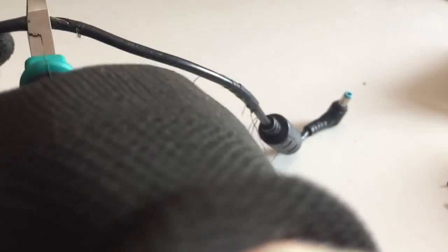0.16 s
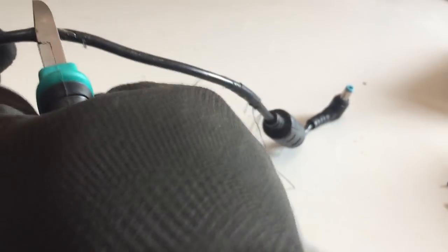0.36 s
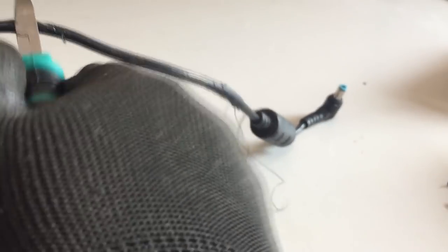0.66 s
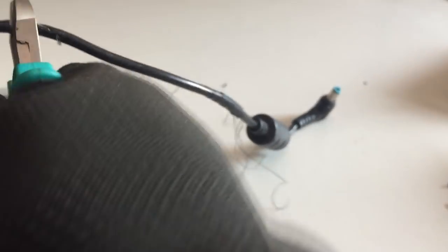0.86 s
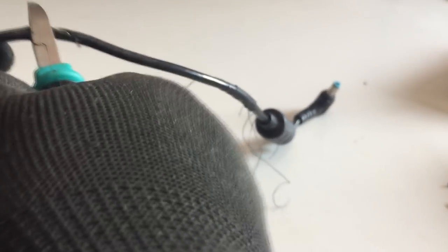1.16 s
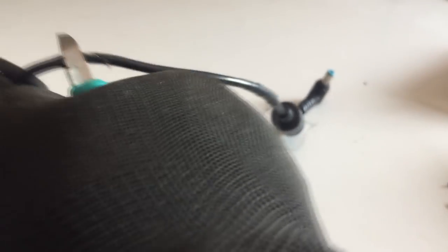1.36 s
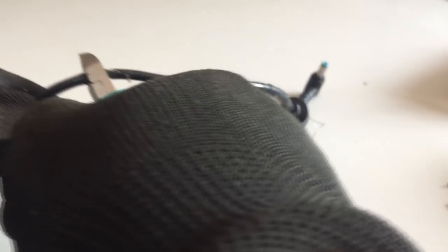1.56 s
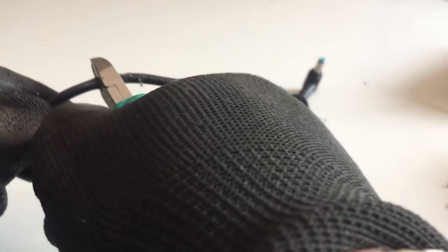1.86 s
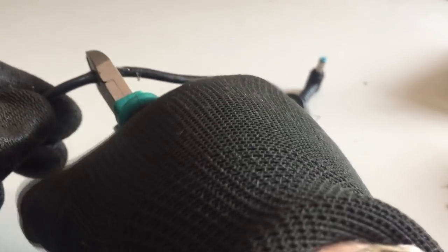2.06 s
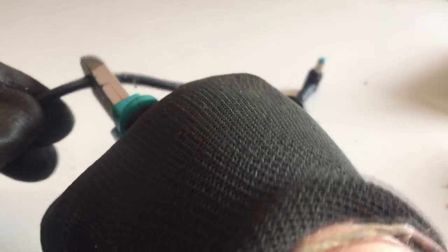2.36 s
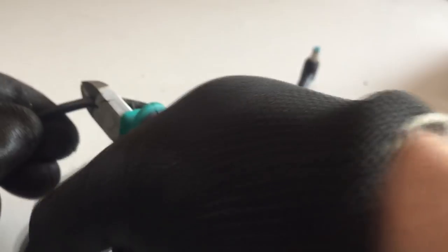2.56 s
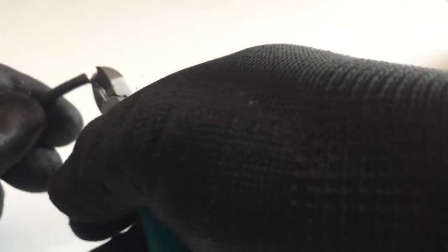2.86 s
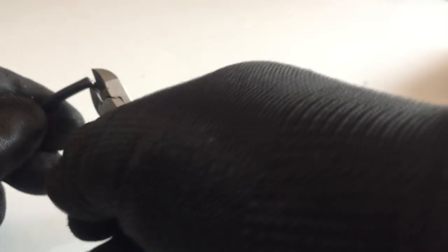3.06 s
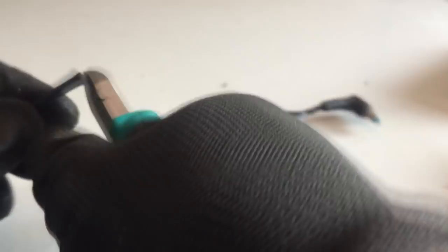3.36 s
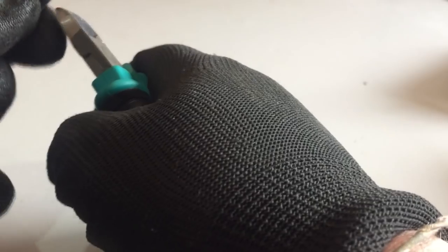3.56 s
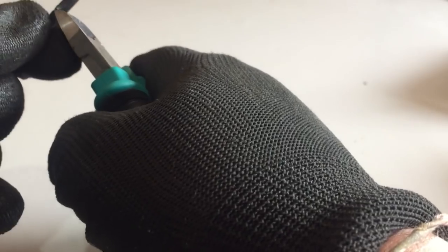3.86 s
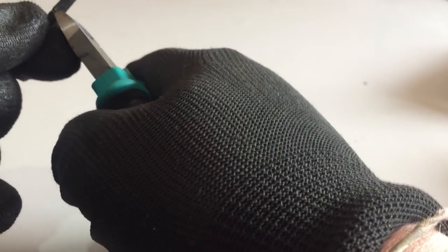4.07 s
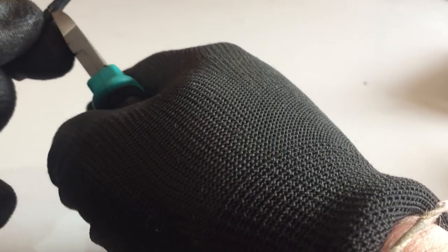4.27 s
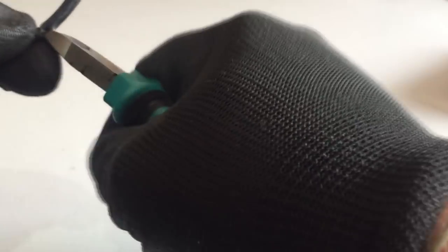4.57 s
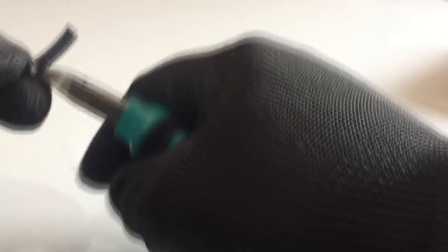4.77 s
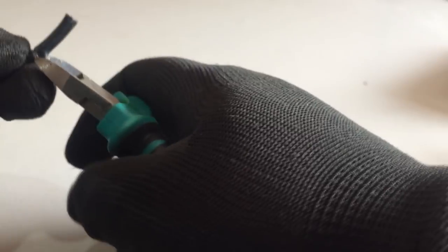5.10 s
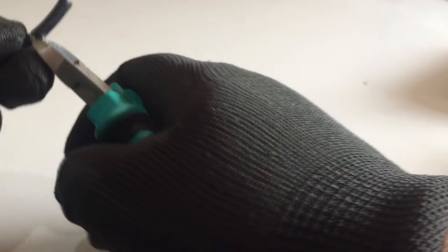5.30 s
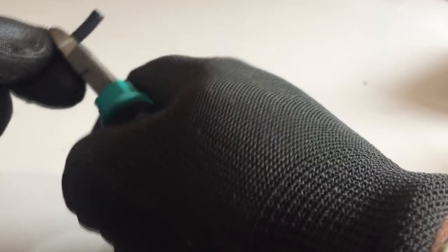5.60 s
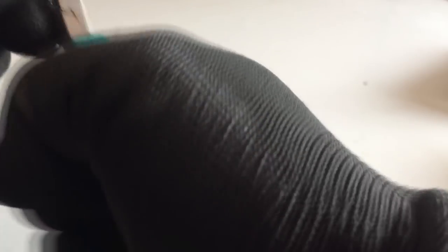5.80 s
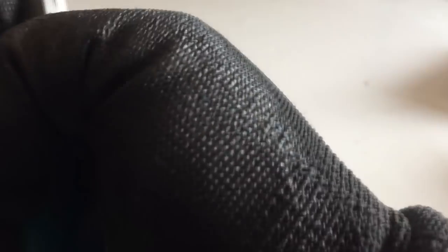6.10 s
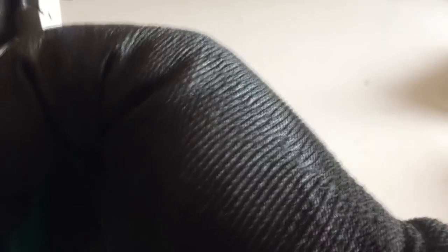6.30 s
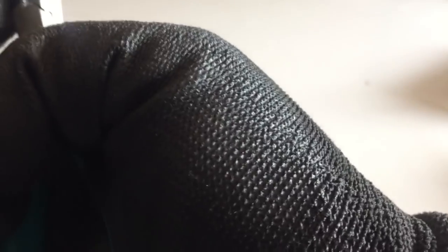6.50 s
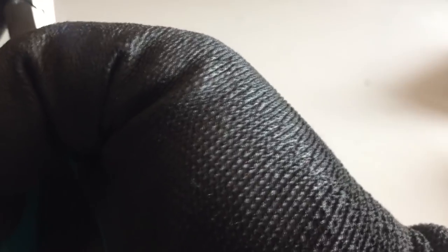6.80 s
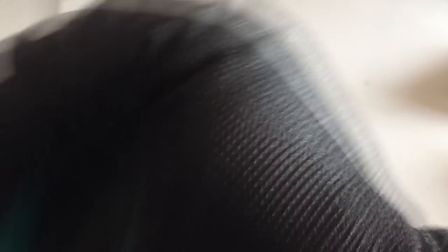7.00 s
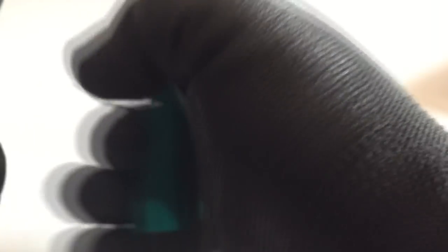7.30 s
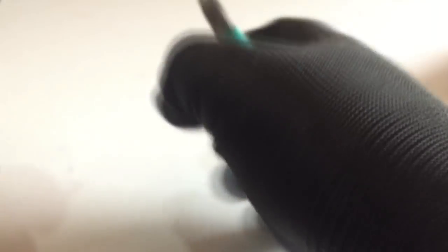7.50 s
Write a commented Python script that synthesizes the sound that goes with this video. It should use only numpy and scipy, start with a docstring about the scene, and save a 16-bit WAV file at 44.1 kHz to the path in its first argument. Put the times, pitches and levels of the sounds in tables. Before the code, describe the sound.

Close to the microphone in a small room, gloves rustle faintly on a cable before side cutters go through it with one hard snip that briefly rings the workbench. A run of dull knocks follows. The jaws then tick through insulation and give two sharp clicks in quick succession, ending in light rubbing, creaks and a few more knocks. Very faint birds chirp outside over a low room rumble.

```python
"""Side cutters at a workbench

Close by in a small room, gloved hands cut a cable: one hard snip sets the bench top's modes ringing.
Dull knocks follow, then the jaws click through insulation. Gloves and cable rub, creak and squeak by
stick-slip friction among soft low thumps, and faint birds chirp outside over a low room rumble."""
import sys
import numpy as np
from scipy import signal
from scipy.fft import rfft, irfft
from scipy.io import wavfile
from scipy.ndimage import uniform_filter1d

SR = 44100
rng = np.random.default_rng(int(sys.argv[2]) if len(sys.argv) > 2 else 0)


def wrap_up_sound(samples):
    """Save the sound to the file named by the first command line argument, as 16-bit audio."""
    columns = np.atleast_2d(samples).T
    # keep every value between -1 and 1, then stretch to whole-number steps
    tamed = np.clip(columns, -1, 1)
    steps = np.round(tamed * 32767).astype(np.int16)
    wavfile.write(sys.argv[1], SR, steps)


N = 337365
TIME = np.arange(N) / SR
HUSH_START_S, HUSH_END_S = 3.511, 4.5  # the ringing of the blows is silent between these times


def snip(pop_hz=1800, pop_width_hz=1900, ring_db=-47.5, thud_db=-51, thud_t60_s=0.26):
    """Impulse excitation: the cable yields, the jaws slam shut, the tool pops and jolts the bench."""
    # contacts during the cut: start_s, level_db, room_db
    contacts = [(2.2038, -10.5, -18), (2.2046, 11, -9), (2.212, -14, -13)]
    # spectrum of the closing jaws: frequency_hz, gain_db
    crack_spectrum = [(40, -12.5), (110, 3), (380, 1), (600, -3), (1000, -6.5), (1350, -4.5), (1700, 1.5),
                      (2080, 0.5), (2350, -5), (2900, -10.5), (3700, -8.5), (4700, -8), (6000, -14.5),
                      (6700, -12), (7600, -22), (9500, -22), (11000, -32.5), (15000, -26)]
    # spectrum of the bench's crowded, damped modes: frequency_hz, relative_density_db
    thud_spectrum = [(30, -26), (70, -3), (110, -3), (250, -13), (500, -14.5), (800, -19), (2000, -53.5),
                     (6000, -81)]
    near, feed = np.zeros((2, N))
    crack = impact(crack_spectrum)
    tool = resonate(crack, pop_hz, pop_width_hz)
    pop = chatter(crack - 2 * tool, t60_s=0.009, db=-14)  # all-pass: the resonance swells after contact
    thud = noise(thud_spectrum)[:SR] * undb(thud_db - 60 * TIME[:SR] / thud_t60_s)
    thud *= 1 - np.exp(-TIME[:SR] / 0.004)
    bench = undb(ring_db) * bench_ring() + thud
    radiated = edge(crack - 0.25 * tool, 4800, "low", order=1)
    for start_s, level_db, room_db in contacts:
        add(near, start_s, undb(level_db) * pop)
        add(near, start_s, undb(level_db) * bench)
        add(feed, start_s, undb(level_db + room_db) * radiated)
    return near, feed


def bench_ring():
    """Free vibration: after a blow, each low mode of the bench top decays at its own rate."""
    # modes of the bench top: frequency_hz, gain_db, t60_s
    bench_modes = [(58.2, 1, 0.74), (70.5, -4.5, 0.4), (108.5, 10.5, 0.16), (115.95, -8.5, 0.58),
                   (126.9, 1.5, 0.7), (142.5, -12.5, 0.37), (161.6, -17, 0.344), (190, -11.5, 0.25),
                   (195, -2, 0.41), (206.6, -15.5, 0.51), (284, -10, 0.64), (294.6, -11, 0.63),
                   (326.2, -9, 0.353), (394, -5, 0.37), (452.7, -10.5, 0.192), (506, -18, 0.21),
                   (664, -14, .25), (712, -14, 0.3)]
    return modes(bench_modes) * (1 - np.exp(-TIME[:SR] / 0.0019))


def knocks(soft_hz=984, jolt_db=-58, jolt_db_per_octave=-7):
    """Contact filtering: all blows ring one body, but a softer one leaves the upper resonances still."""
    # blows about the bench: start_s, level_db, hardness_hz, low_cut_hz, room_db
    blows = [(0.0861, -21, 2480, 200, 2), (2.6041, -9.5, 940, 50, -4.5), (2.9984, 4.5, 1010, 694, -3),
             (3.0226, 0.5, 1850, 520, 3), (3.3283, -12, 1270, 194, -0.5), (3.3457, -13.5, 1140, 200, 1.5),
             (3.4585, -18.5, 3500, 1490, -1.5), (3.4902, -8, 865, 380, 5), (3.5058, -2.5, 1440, 1100, -5),
             (7.4073, -5, 3970, 700, 0), (7.456, -20, 2600, 1820, 0), (7.4614, -9.5, 2980, 1960, -2),
             (7.5055, -15.5, 2880, 1700, 1), (7.5328, -16, 3600, 2200, -1.5)]
    # damped resonances of the struck body: frequency_hz, width_hz, gain_db
    resonances = [(315, 230, 7), (730, 280, -7.5), (1060, 690, -2), (1570, 380, -8.5), (1990, 730, -10),
                  (2410, 490, -10), (3200, 1100, -10), (3950, 480, -12), (9200, 2600, -2.5)]
    near, feed = np.zeros((2, N))
    impulse, ring = signal.unit_impulse(2048), bench_ring()
    body = sum(undb(db) * resonate(impulse, hz, width_hz) for hz, width_hz, db in resonances)
    body = body - 2 * resonate(body, 1200, 1700)  # all-pass: the body takes a cycle to get moving
    for start_s, level_db, hardness_hz, low_cut_hz, room_db in blows:
        blow = edge(body, hardness_hz, "low", order=3)
        blow = undb(level_db) * edge(blow, low_cut_hz, "high", order=1)
        # mostly the middle frequencies reach the room
        radiated = edge(blow, max(hardness_hz, 2120), "low", order=4)
        radiated = undb(room_db) * edge(radiated, 420, "high", order=1)
        surface_echo = undb(-12.5) * delay(blow, 0.00311)
        wall_echo = undb(-12.5) * edge(radiated, 1040, "high", order=1)
        # a harder contact comes from a lighter part and jolts the bench less
        ring_db = level_db + jolt_db + jolt_db_per_octave * np.log2(hardness_hz / soft_hz)
        add(near, start_s, chatter(blow + surface_echo, t60_s=0.026, db=-0.5))
        add(near, start_s, undb(ring_db) * ring)
        add(near, start_s + 0.018, chatter(wall_echo, t60_s=0.013, db=3.5))
        add(feed, start_s, radiated)
    return near, feed


def jaw_clicks(room_db=-17.5, pitch_spread=0.022):
    """Stepwise fracture: the jaws break through in tiny sharp steps, each briefly ringing the steel."""
    # bites into insulation and strands: start_s, level_db, low_cut_hz
    bites = [(4.497, -31, 5500), (4.571, -29.5, 1200), (4.588, -38, 3500), (4.652, -36, 3000),
             (4.668, -38, 2500), (4.7259, -30.5, 2000), (6.0093, -24.5, 699), (6.0115, -21.5, 700),
             (6.02, -31, 5000), (6.0896, -27, 1500), (6.095, -28, 3500), (6.1, -23, 1000),
             (6.1035, -28, 6000), (6.1204, -21, 1000), (6.125, -24, 3500), (6.144, -22, 3500),
             (6.1504, -2, 500), (6.1741, -1.5, 503), (6.181, -24, 4000), (6.282, -20, 7000),
             (6.7737, -25, 3980), (6.9988, -39.5, 2500), (7.077, -36, 1490), (7.126, -27, 1500),
             (7.1442, -21, 5000), (7.221, -30, 2000), (7.258, -31, 1500), (7.317, -22.5, 1500),
             (7.534, -32, 6000), (7.5535, -36, 4500)]
    # spectrum of the steel jaws: frequency_hz, gain_db
    jaw_spectrum = [(200, -44), (1200, -33), (1500, -47.5), (1800, -5), (2500, -1.5), (3200, -8),
                    (4300, -1), (5000, -6), (5900, -2.5), (7000, -3.5), (7700, -17.5), (8600, -7),
                    (9900, -10.5), (10700, -16.5), (14000, -14), (15800, -18)]
    # modes of the steel: mean_frequency_hz, gain_db, t60_s
    jaw_modes = [(2490, -48, 0.012), (4314, -46, .02), (6200, -48, 0.014)]
    near, click = np.zeros(N), impact(jaw_spectrum)
    for start_s, level_db, low_cut_hz in bites:
        # each bite lands elsewhere on the blades and shifts their ring
        bite = modes(jaw_modes, 1 + pitch_spread * rng.standard_normal())
        # the weaker the bite, the longer the chatter and the larger its share
        bite[:len(click)] += chatter(click, t60_s=0.0083 * 2 ** (-level_db / 13), db=-24 - level_db / 2)
        add(near, start_s, undb(level_db) * edge(bite, low_cut_hz, "high"))
    return near, undb(room_db) * near


def rubs(slips_per_s=9000, uneven_db=3, room_db=-15, fastest_share=0.55, squeak_above_db=-60.5):
    """Sliding friction: knit and rubber catch and slip in tiny ticks that swell with the hand's speed."""
    # strokes of glove on cable: start_s, end_s, level_db, brightness_hz
    strokes = [(0, 0.033, -61, 11700), (0.047, 0.093, -61, 8500), (0.33, .47, -83, 12000),
               (0.593, 0.648, -62, 10100), (0.783, 0.847, -63, 6100), (1.0, 1.38, -80.5, 10900),
               (2.555, 2.652, -71, 11900), (2.705, 2.87, -73.5, 12000), (3.244, 3.43, -75, 5290),
               (3.436, 3.482, -64.5, 10800), (4.322, 4.821, -74.5, 14700), (4.85, 5.02, -77, 12000),
               (5.446, 5.58, -71, 5130), (5.722, 5.955, -72, 10500), (6.055, 6.157, -63.5, 7100),
               (6.214, 6.377, -70, 9500), (6.705, 6.843, -75, 7960), (7, 7.224, -66.5, 9200),
               (7.068, 7.109, -56.5, 9900), (7.087, 7.16, -55.5, 13500), (7.214, 7.258, -62.5, 11200),
               (7.245, 7.335, -59, 12700), (7.32, 7.618, -74.5, 13900)]
    # spectrum of one slip: frequency_hz, gain_db
    slip_spectrum = [(200, -2.5), (700, -15.5), (1150, -6.5), (1400, -15), (1750, -9.5), (2300, -6.5),
                     (2900, -5.5), (3700, -3.5), (4900, -11.5), (6200, -6.5), (7600, -13), (9200, -6.5),
                     (10500, -13), (12000, -6.5), (15500, -6.5)]
    # rubber resonances that squeak on hard strokes: frequency_hz, stage_width_hz, gain_db
    resonances = [(1760, 680, -14), (6260, 3200, -2.5)]
    slips = rng.standard_normal(N) * undb(uneven_db * rng.exponential(size=N).clip(0, 5))
    slips *= rng.random(N) < slips_per_s / SR
    slips *= undb(-wobble(N, 140))  # the ribs of the knit bunch the ticks into a rasp
    rasp = signal.fftconvolve(slips, impact(slip_spectrum))[:N]
    squeak = sum(undb(db) * narrow_ring(slips, hz, width_hz) for hz, width_hz, db in resonances)
    near = np.zeros(N)
    for start_s, end_s, level_db, brightness_hz in strokes:
        span = (TIME >= start_s) & (TIME < end_s)
        progress = (TIME[span] - start_s) / (end_s - start_s)
        speed = np.sin(np.pi / 2 * np.interp(progress, [0, fastest_share, 1], [0, 1, 0]))
        friction = unit(edge(rasp[span], brightness_hz, "low"))
        if level_db > squeak_above_db:
            friction += speed * squeak[span]
        near[span] += undb(level_db) * speed * friction
    return near, undb(room_db) * near


def creaks_and_whistle_ring(pulses_per_s=900, uneven_db=3, room_db=-11):
    """Pulse-driven resonance: stick-slip creaks of sheath and glove, and a bird's lingering ring."""
    # narrow-band sounds: start_s, length_s, pitch_hz, stage_q, level_db
    # the rows at 6.134 s and 6.254 s are the faint high ring of a distant bird's whistle
    bursts = [(0.056, 0.026, 3180, 4.4, -62.5), (0.232, 0.1, 1018, 12, -66), (0.596, 0.063, 1100, 2.7, -65),
              (0.585, 0.065, 3100, 15, -71), (0.61, 0.029, 4400, 14, -68), (0.776, 0.085, 3440, 9.9, -66),
              (0.79, 0.055, 1420, 3.4, -73), (3.4527, 0.012, 1930, 5.9, -50),
              (4.926, 0.057, 1270, 3, -64.5), (4.974, 0.023, 1280, 3.7, -58),
              (4.967, 0.025, 2300, 2.5, -68.5), (6, 0.024, 1340, 1.6, -66), (6.081, 0.051, 3920, 4.7, -64),
              (6.134, 0.58, 4070, 3.2, -76.5), (6.254, 0.078, 4140, 2.7, -68.5),
              (7.073, 0.0096, 2230, 1.1, -47), (7.081, 0.11, 1760, 7.8, -62),
              (7.087, 0.039, 2600, 6.1, -65), (7.139, 0.017, 6060, 7.7, -55),
              (7.205, 0.073, 1800, 4.5, -65), (7.23, 0.094, 2380, 6.6, -67), (7.269, 0.0094, 1770, 6, -55),
              (7.276, 0.039, 6240, 7.9, -58.5), (7.311, 0.009, 3570, 5.8, -54)]
    near = np.zeros(N)
    for start_s, length_s, pitch_hz, stage_q, level_db in bursts:
        n = int(length_s * SR)
        pace = rng.exponential(size=n // 40 + 1).repeat(40)[:n]
        pulse_count = np.floor(np.cumsum(pace) * pulses_per_s / SR)
        pulses = np.diff(pulse_count, prepend=-1) * undb(uneven_db * rng.standard_normal(n))
        ring = narrow_ring(pulses, pitch_hz, pitch_hz / stage_q)
        add(near, start_s, undb(level_db) * np.hanning(n) * ring)
    return near, undb(room_db) * near


def grip_squeaks(length_s=0.024, sag=0.036, room_db=-8):
    """Roughness by modulation: the gripped cable squeaks in fluttering tones that sag in pitch."""
    # three quick squeaks: start_s, level_db
    squeaks = [(3.272, -87.5), (3.327, -77), (3.38, -75.5)]
    # partials of a squeak: start_hz, gain_db
    partials = [(3850, 3), (4330, -1), (5720, -6)]
    near = np.zeros(N)
    for start_s, level_db in squeaks:
        for start_hz, gain_db in partials:
            tone = glide(length_s, start_hz, start_hz * (1 - sag), waver=0.025)
            flutter = 1 + wobble(len(tone), 350)
            add(near, start_s, undb(level_db + gain_db) * tone * flutter)
    return near, undb(room_db) * near


def low_thumps():
    """Windowed tone bursts: soft low thumps, some of them the low body of the knocks."""
    # soft low thumps: start_s, pitch_hz, length_s, level_db
    thumps = [(0.0847, 328, 0.0063, -39), (0.086, 212, 0.047, -53.5), (0.088, 400, 0.029, -60),
              (0.602, 54.7, 0.044, -59), (1.76, 133, 0.15, -57), (2.601, 195, 0.037, -45),
              (2.599, 113, 0.035, -42.5), (3.457, 109, 0.033, -45.5), (6.194, 84.5, 0.025, -55.5),
              (7.075, 73, 0.022, -33), (7.404, 196, 0.033, -56.5)]
    near = np.zeros(N)
    for start_s, pitch_hz, length_s, level_db in thumps:
        n = int(length_s * SR)
        add(near, start_s, undb(level_db) * np.hanning(n) * np.sin(2 * np.pi * pitch_hz * TIME[:n]))
    return near


def birds(pip_s=0.053, pip_rise_hz=72, tremble=0.4, direct_db=-4, room_db=-8):
    """Frequency-modulated song: one bird repeats two rising whistles, another gives thin pips."""
    # phrases of the first bird: start_s, level_db
    phrases = [(1.88, -83), (3.99, -74), (6.0, -73)]
    # notes of a phrase: delay_s, length_s, start_hz, end_hz, accent_share, gain_db
    notes = [(0, .18, 3976, 4700, 0.78, 0), (0.147, .23, 3033, 3492, .4, -3.5)]
    # pips of the second bird: start_s, pitch_hz, level_db
    pips = [(1.085, 6080, -77), (1.09, 6470, -78.5), (1.361, 6700, -82), (1.41, 6800, -85),
            (1.495, 6250, -77), (1.837, 7120, -87), (4.397, 6040, -76), (4.462, 6100, -79),
            (4.671, 6750, -81)]
    song = np.zeros(N)
    for start_s, level_db in phrases:
        for delay_s, length_s, start_hz, end_hz, accent_share, gain_db in notes:
            note = glide(length_s, start_hz, end_hz, waver=0.00408, accent_share=accent_share)
            add(song, start_s + delay_s, undb(level_db + gain_db) * note)
    for start_s, pitch_hz, level_db in pips:
        add(song, start_s, undb(level_db) * glide(pip_s, pitch_hz, pitch_hz + pip_rise_hz, waver=0.0086))
    song *= 1 + tremble * wobble(N, 90)
    return undb(direct_db) * song, undb(room_db) * song


def room(feed, build_s=0.005, treble_hz=7500, bands=10):
    """Reverberation: a diffuse field builds up quickly in the small room, and its treble dies first."""
    # reverberation times: frequency_hz, t60_s
    decay_times = [(60, 1), (300, 0.322), (1000, 0.41), (2500, 0.374), (6000, 0.37), (14000, 0.1097)]
    t, hz = TIME[:SR], np.fft.rfftfreq(SR, 1 / SR)
    centres_hz = np.geomspace(decay_times[0][0], decay_times[-1][0], bands)
    white, tail = rfft(rng.standard_normal(SR)), 0
    for weights, t60_s in zip(np.eye(bands), on_log(centres_hz, decay_times)):
        band = irfft(white * on_log(hz, np.c_[centres_hz, weights]), SR)
        fade = undb(-60 * t / t60_s) * (1 - np.exp(-(t / build_s) ** 2))
        tail = tail + band * fade / np.linalg.norm(fade)
    return signal.fftconvolve(feed, edge(tail, treble_hz, "low"))[:N]


def room_noise(base_db=-70, split_hz=400, swell_at_s=2.9, swell_width_s=0.93):
    """Broadband ambient noise: a low rumble swells once under a smooth hiss, then both step down."""
    # spectrum of the background: frequency_hz, relative_density_db
    air_spectrum = [(15, -44.5), (25, -22.5), (43, -9), (92, -3.5), (161, -3), (300, -11), (384, -15),
                    (531, -18.5), (840, -21), (1040, -22), (1890, -24), (4100, -26), (4750, -29),
                    (6200, -28.5), (9400, -34), (10500, -37), (11500, -35), (12900, -39.5), (16000, -56)]
    bed = undb(base_db) * noise(air_spectrum)
    rumble = edge(bed, split_hz, "low", order=1)
    hiss = bed - rumble
    swell_db = 6 * np.exp(-((TIME - swell_at_s) / swell_width_s) ** 2)
    rumble_db = np.where(TIME < HUSH_START_S, 1.4 + swell_db, -0.69)
    hiss_db = np.where(TIME < HUSH_START_S, 2.95, 1.82)
    return rumble * undb(rumble_db) + hiss * undb(hiss_db)


def glide(length_s, start_hz, end_hz, waver, accent_share=0.51, accent_db=12, accent_s=0.018):
    """Frequency sweep: a tone slides ever faster while it swells to a brief accent and fades."""
    n = int(length_s * SR)
    progress = np.linspace(0, 1, n)
    hz = (start_hz + (end_hz - start_hz) * progress ** 1.6) * (1 + waver * wobble(n, 150))
    accent = undb(accent_db * np.exp(-((progress - accent_share) * length_s / accent_s) ** 2))
    envelope = np.sqrt(np.abs(np.sin(np.pi * progress))) * accent
    return envelope * np.sin(2 * np.pi * np.cumsum(hz) / SR)


def impact(spectrum, size=2048):
    """Minimum phase: the tightest causal click with a given spectrum."""
    gain = undb(on_log(np.fft.rfftfreq(size, 1 / SR), spectrum))
    cepstrum = irfft(np.log(gain))
    cepstrum[1:size // 2] *= 2
    cepstrum[size // 2 + 1:] = 0
    return irfft(np.exp(rfft(cepstrum)))[:size // 2]


def chatter(click, t60_s, db):
    """Repeated contact: touching parts follow a click with a dense, decaying run of copies."""
    t = TIME[:len(click)]
    contacts = rng.standard_normal(len(t)) * undb(-60 * t / t60_s) * (1 - np.exp(-t / 0.00042))
    return click + undb(db) * signal.fftconvolve(click, contacts / np.linalg.norm(contacts))[:len(t)]


def modes(table, pitch_ratio=1):
    """Modal superposition: a sum of exponentially decaying sines."""
    t = TIME[:SR]
    return sum(np.sin(2 * np.pi * hz * pitch_ratio * t) * undb(db - 60 * t / t60_s)
               for hz, db, t60_s in table)


def resonate(x, hz, width_hz):
    """Second-order resonance, gain 1 at its centre."""
    return signal.lfilter(*signal.iirpeak(hz, hz / width_hz, fs=SR), x)


def narrow_ring(x, hz, stage_width_hz):
    """Two equal resonant stages in cascade, scaled to rms 1."""
    return unit(resonate(resonate(x, hz, stage_width_hz), hz, stage_width_hz))


def noise(spectrum):
    """Spectrally shaped noise of rms 1."""
    gain = undb(on_log(np.fft.rfftfreq(N, 1 / SR), spectrum))
    return unit(irfft(rfft(rng.standard_normal(N)) * gain, N))


def wobble(n, cutoff_hz):
    """Random modulation: low-passed noise of rms 1."""
    return unit(edge(rng.standard_normal(n), cutoff_hz, "low"))


def edge(x, hz, kind, order=2):
    """Maximally flat low-pass or high-pass."""
    return signal.sosfilt(signal.butter(order, hz, kind, fs=SR, output="sos"), x)


def delay(x, delay_s):
    """Propagation delay: the same sound a moment later."""
    return np.interp(TIME[:len(x)] - delay_s, TIME[:len(x)], x, left=0)


def add(track, start_s, sound):
    """Superpose a sound on a track."""
    i = int(start_s * SR)
    track[i:i + len(sound)] += sound[:N - i]


def on_log(hz, points):
    """Interpolate (frequency_hz, value) points on a log-frequency axis."""
    points_hz, values = np.transpose(points)
    return np.interp(np.log(hz + 1), np.log(points_hz), values)


def undb(db):
    """Decibels to amplitude ratio."""
    return 10 ** (np.asarray(db) / 20)


def unit(x):
    """Scale to rms 1."""
    return x / np.sqrt(np.mean(x ** 2))


def scene():
    """Direct plus reverberant sound: sources give a near part and a feed to the room."""
    near, feed = np.sum([snip(), knocks(), creaks_and_whistle_ring(), grip_squeaks()], axis=0)
    # the ringing stops dead after the first run of knocks
    gate = uniform_filter1d(1.0 * ((TIME < HUSH_START_S) | (TIME > HUSH_END_S)), size=100)
    gated = (near + room(feed)) * gate
    near, feed = np.sum([jaw_clicks(), rubs(), birds()], axis=0)
    return (gated + near + room(feed) + low_thumps() + room_noise())[None]


def record(dry, low_cut_hz=37.2, top_hz=16000):
    """Band limiting: the microphone sheds the deepest bass and cuts the top."""
    low_pass = signal.ellip(8, 0.2, 70, top_hz, fs=SR, output="sos")
    return signal.sosfilt(low_pass, edge(dry, low_cut_hz, "high", order=4))


dry = scene()
out = record(dry)
wrap_up_sound(out)
```